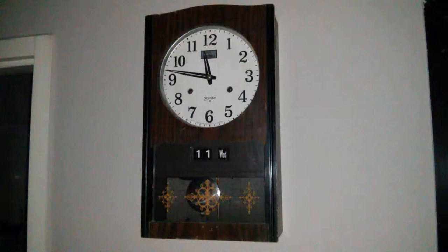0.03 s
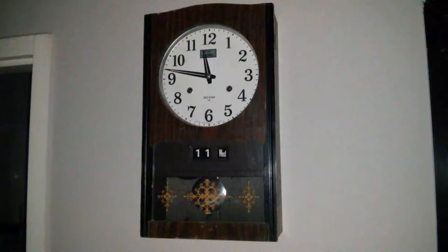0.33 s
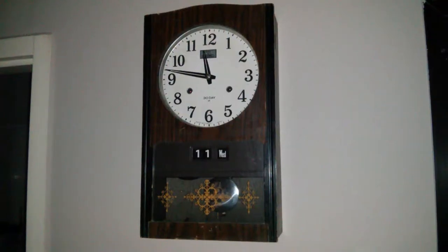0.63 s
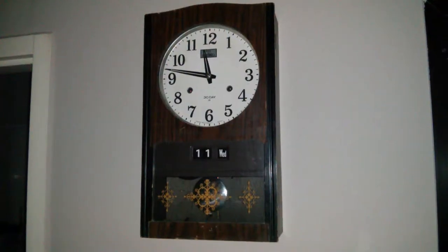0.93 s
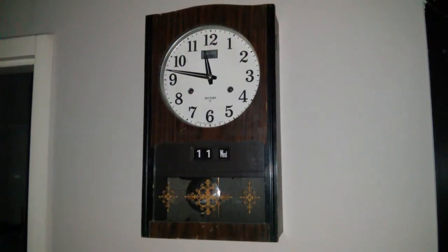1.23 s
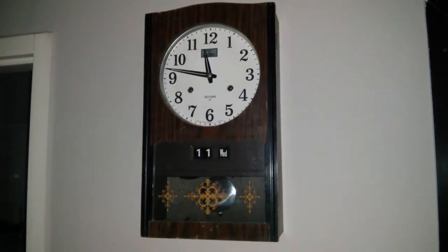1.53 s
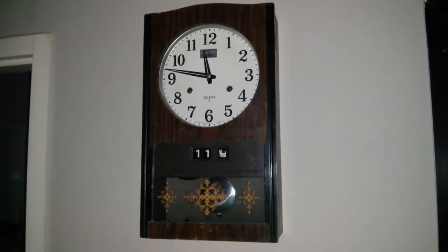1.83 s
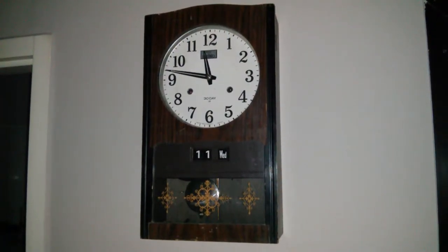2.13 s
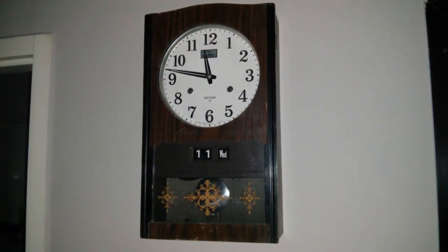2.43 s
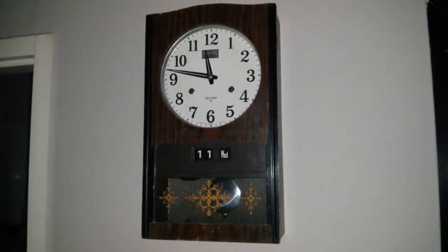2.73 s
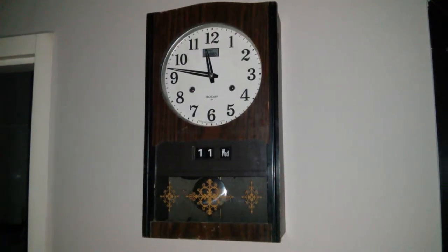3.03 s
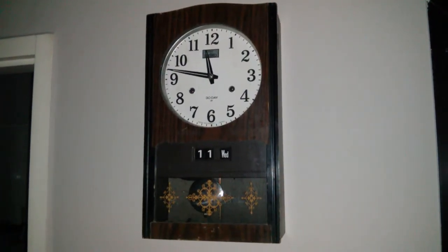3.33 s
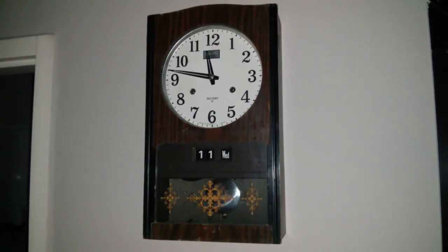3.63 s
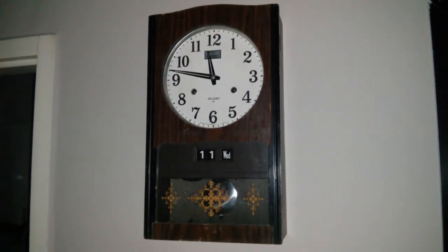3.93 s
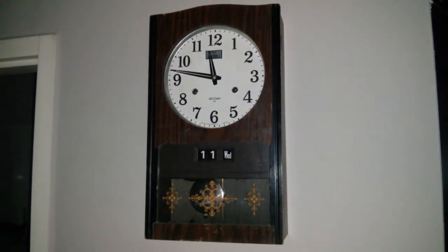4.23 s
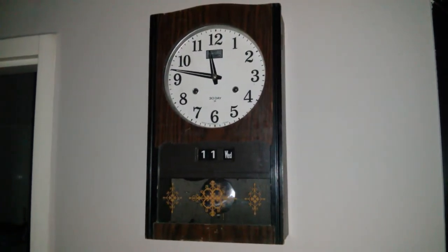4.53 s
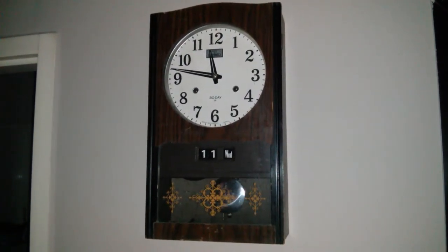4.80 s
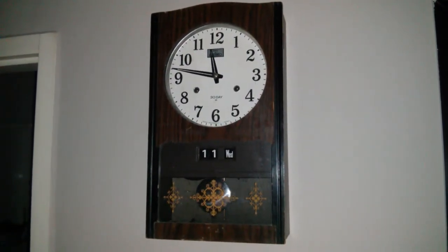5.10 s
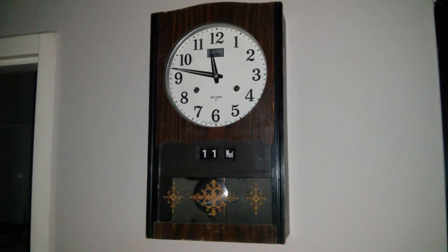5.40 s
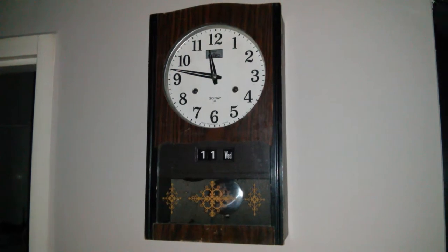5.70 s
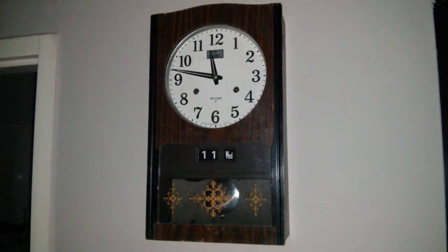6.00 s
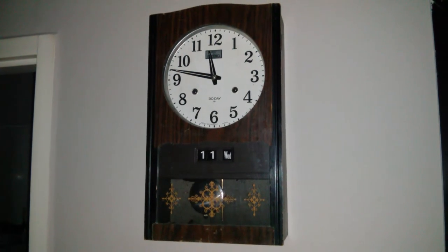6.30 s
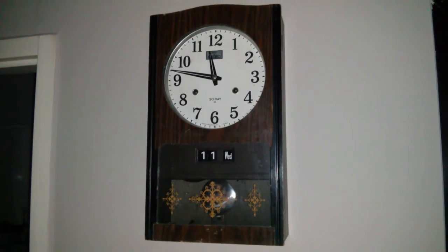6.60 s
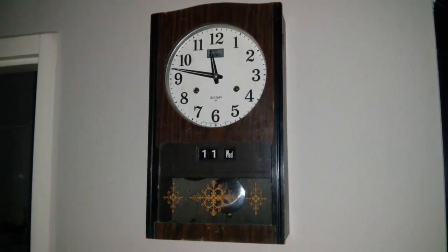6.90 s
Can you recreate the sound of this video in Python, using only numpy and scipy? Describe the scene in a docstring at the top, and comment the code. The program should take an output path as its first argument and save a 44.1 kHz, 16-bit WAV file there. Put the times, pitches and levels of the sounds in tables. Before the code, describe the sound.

A wooden pendulum wall clock ticks about twice a second in a quiet room, a bright tick alternating with a duller, softer tock. About a second in, one loud, sharp pop hits the microphone. A little later come a soft bump and a few tiny clicks close by. The clock keeps going over a faint low rumble, hum and hiss.

```python
"""A quiet room with a low rumble and hum, the microphone listening to a wooden pendulum wall clock.
It ticks slightly out of beat: the two pallets of the escapement ring the same movement and case, each
in its own way, and the room answers. One loud pop overloads the microphone; later come a soft bump and
a few tiny clicks close by. Faint hiss lies under it all, and a deep throb rises at the end."""
import sys
import numpy as np
from scipy import signal
from scipy.fft import rfft, irfft, next_fast_len
from scipy.io import wavfile
from scipy.ndimage import uniform_filter1d

SR = 44100
rng = np.random.default_rng(int(sys.argv[2]) if len(sys.argv) > 2 else 0)


def unload_audio(sound):
    """Save the sound as a 16-bit wav file, at the path given as the first command line argument."""
    columns = np.transpose(np.atleast_2d(sound))
    # keep every value between -1 and 1, then stretch to whole-number steps
    steps = np.round(np.clip(columns, -1, 1) * 32767)
    wavfile.write(sys.argv[1], SR, steps.astype(np.int16))


N = 315315

# Spectra of the room's rumble and deep throb: freq_hz, density_db
RUMBLE_SPECTRUM = [(12, -9.5), (20, -7), (32, -14.5), (48, -4.5), (75, -6.5), (100, -3), (160, -4),
                   (240, -9), (310, -12), (385, -26.5), (435, -19.5), (510, -33), (620, -23.5), (780, -37),
                   (3000, -61)]
THROB_SPECTRUM = [(10, -27), (24, -11), (32, 3), (42, -12), (70, -22), (130, -12), (190, -23.5),
                  (300, -62)]
# Slow wobble of the low end's level and of the hum's pitch: rate_hz, density_db
LEVEL_WOBBLE = [(1, -1.5), (7, 0.5), (16, -41), (60, -120)]
PITCH_WOBBLE = [(1, -0.5), (6, -2), (15, -38.5), (60, -120)]
# Long surges of rumble and hum, and lulls in the hum alone: middle_s, half_width_s, gain_db
LOW_SURGES = [(0.7, 0.6, 7.3), (3.85, 0.45, 3.5), (6.8, 0.42, 5.5)]
HUM_DIPS = [(3.05, 0.51, -13), (4.62, 0.25, -12.5)]
# Spectra of the faint whir, the microphone's hiss and the high fizz: freq_hz, density_db
WHIR_SPECTRUM = [(600, -30.5), (1150, -16.5), (1350, -6), (1550, -14.5), (1750, -8), (1900, 1),
                 (2050, -5), (2300, -18), (2750, -14), (3200, -22), (5800, -12), (8000, -32.5)]
HISS_SPECTRUM = [(300, -0.5), (1000, -2), (1400, -2.5), (1650, -4), (1900, 0.5), (2400, -7.5), (3300, -8.5),
                 (4500, -4.5), (5700, -1.5), (7400, -5.5), (10000, -4), (15600, -1.5), (16100, -40)]
FIZZ_SPECTRUM = [(3000, -36), (7500, -19.5), (9500, -10), (12000, -3), (14500, 2), (15700, -3),
                 (16100, -44.5)]
# Modes of the movement and wooden case: pitch_hz, tick_db, tock_db
CLOCK_MODES = [(1139, -28, -17), (1314, -3, -1), (1354, -9, -6), (1386, -2, 1), (1445, 2, -5),
               (1529, -13, -13), (1553, -12, -12), (1645, -15, -23), (1744, -10, -12), (1785, -10, -15),
               (1806, -11, -11), (1865, -10, -21), (1938, -9, -7), (1995, -12, -18), (2030, -8, -20),
               (2075, -7, -25), (2134, -15, -30), (2191, -4, -20), (2223, -11, -28), (2466, -21, -23),
               (2519, -18, -17), (2589, -12, -16), (2622, -9, -12), (2665, -13, -10), (2727, -14, -10),
               (2980, -28, -23)]
# The low modes take longer to get swinging: pitch_hz, rise_s
MODE_RISE = [(1350, .011), (2100, 0.00087)]
# How long case and room ring: freq_hz, t60_s
RING_TIMES = [(500, 0.52), (1350, 0.48), (2000, 0.39), (2700, .45), (5000, 0.81), (9000, 0.13)]
# Dense ring between the modes, and the extra brightness of first contact: freq_hz, gain_db
TICK_SPECTRUM = [(500, -48.5), (1080, -34), (1240, -19.5), (1420, -4), (1640, -12), (1850, -6.5),
                 (2220, -15), (2350, -31), (2650, -10), (2830, -20.5), (3200, -41.5), (4000, -46.5),
                 (4950, -34), (6500, -46)]
TOCK_SPECTRUM = [(500, -42.5), (1050, -24), (1240, -12), (1380, -1), (1660, -15.5), (1920, -9.5),
                 (2100, -17), (2350, -26.5), (2680, -7), (2830, -22.5), (3200, -32.5), (4000, -50),
                 (5100, -35), (8000, -47)]
CONTACT_TILT = [(1400, -8), (2100, 4), (3000, -1.5), (4500, -5)]
# Ping of the steel escapement: pitch_hz, level_db, t60_s
PING_MODES = [(4620, -9, 0.27), (4900, -3, 0.073), (5080, -2, 0.076), (5370, -14, 0.087)]
# That ping as the room returns it: freq_hz, gain_db
PING_ROOM_SPECTRUM = [(3300, -30), (4400, -6), (5100, -1), (5600, -9), (6500, -24)]
# The pop at the microphone and the sizzle after it: freq_hz, gain_db
POP_SPECTRUM = [(150, 1), (450, -1.5), (800, 2), (1300, -7), (1900, -2), (2300, -10.5), (3000, -9),
                (3450, -20), (3900, -4.5), (4350, 7), (4850, -7), (5500, 2.5), (8000, 2.5), (15000, 5.5)]
SIZZLE_SPECTRUM = [(1500, -11), (4000, -9), (9000, 2.5), (15600, -3), (16100, -38.5)]
# The clearest swells in the rumble: middle_s, pitch_hz, level_db
CLEAR_SWELLS = [(1.891, 167, -67.5), (3.632, 175, -66), (4.04, 228, -66.5), (4.17, 254, -69),
                (4.49, 184, -68.5), (5.031, 273, -69.5), (7.01, 234, -65)]
# Tiny clicks close to the microphone: start_s, level_db, edge_db
CLOSE_CLICKS = [(2.8998, -67, 16), (2.9071, -55, 13.5), (2.91, -56.5, -4), (2.939, -67.5, 20),
                (2.945, -64, 3)]
# Modes of the small hard thing that clicks: pitch_hz, level_db, t60_s
SMALL_OBJECT_MODES = [(3940, -5, 0.035), (4260, 0.5, 0.018), (5400, -1, 0.022), (10700, -10, .012)]
# A click's sharp edge and its return from the room: freq_hz, gain_db
EDGE_SPECTRUM = [(1000, -36), (3300, -26), (4200, -5), (7500, -21), (11000, 0), (13000, -27)]
CLICK_ROOM_SPECTRUM = [(3000, -32), (4000, 5), (4800, -6), (5600, 8), (7000, -12), (14000, -22)]

FIRST_TICK_S, SWING_S = 0.630, 1.0356  # one tick and one tock to each full swing
LOUD_PING_SWINGS = (0, 3)
POP_S = 1.0633
TIME_S = np.arange(N) / SR


def amp(db):
    return 10 ** (np.asarray(db) / 20)


def unit(x):
    """Scales to an energy of 1."""
    return x / np.sqrt(np.sum(x ** 2) + 1e-20)


def read(table, hz):
    """Reads a table on a log-frequency axis."""
    freqs, values = np.transpose(table)
    return np.interp(np.log(hz + 1), np.log(freqs + 1), values)


def seconds(length_s):
    return np.arange(int(length_s * SR)) / SR


def add(mix, start_s, sound):
    part = mix[max(round(start_s * SR), 0):][:len(sound)]
    part += sound[:len(part)]


def ramp(start_s, length_s):
    """Goes from 0 to 1 in a straight line, then holds."""
    return np.clip((TIME_S - start_s) / length_s, 0, 1)


def humps(rows):
    """A gain curve in dB, one smooth bell to a row."""
    return sum(db * np.exp(-((TIME_S - middle_s) / width_s) ** 2) for middle_s, width_s, db in rows)


def colour(x, spectrum):
    """Minimum-phase filter: nothing rings before a blow."""
    size = next_fast_len(len(x) + 4096)
    log_gain = np.log(amp(read(spectrum, abs(np.fft.fftfreq(size, 1 / SR)))))
    response = np.exp(np.conj(signal.hilbert(log_gain)))[:size // 2 + 1]
    return irfft(rfft(x, size) * response, size)[:len(x)]


def noise(spectrum, count=N):
    """Coloured noise of rms 1."""
    return unit(colour(rng.standard_normal(count), spectrum)) * np.sqrt(count)


def rumble_and_hum(rumble_db=-73, hum_db=-72.5, hum_hz=50.2):
    """The room's low end: rumble and a wavering hum that wobble and surge together."""
    wobble, surge_db = noise(LEVEL_WOBBLE), humps(LOW_SURGES)
    rumble = noise(RUMBLE_SPECTRUM) * amp(rumble_db + surge_db + 2 * wobble)
    pitch_hz = hum_hz * (1 + 0.017 * noise(PITCH_WOBBLE))
    hum = np.sqrt(2) * np.sin(2 * np.pi * np.cumsum(pitch_hz) / SR)
    return rumble + hum * amp(hum_db + 0.7 * surge_db + humps(HUM_DIPS) + 1.25 * wobble)


def whir(level_db=-80, drop_db=14.5):
    """A faint, narrow whir that sinks after the pop."""
    return noise(WHIR_SPECTRUM) * amp(level_db - drop_db * ramp(POP_S, length_s=0.35))


def hiss_and_fizz(hiss_db=-81, fizz_db=-73, drop_s=4.315, drop_db=20.5, return_db_per_s=5.5):
    """Steady microphone hiss, and a high fizz that falls away and creeps back."""
    dip_db = return_db_per_s * np.maximum(TIME_S - drop_s, 0) - drop_db * ramp(drop_s, length_s=0.2)
    return amp(hiss_db) * noise(HISS_SPECTRUM) + amp(fizz_db + dip_db) * noise(FIZZ_SPECTRUM)


def ring(t, hz, t60_s):
    """One dying mode at a random phase."""
    return amp(-60 * t / t60_s) * np.sin(2 * np.pi * (hz * t + rng.random()))


def diffuse(t, spectrum, rise_s):
    """Dense reflections that build up, then die band by band."""
    hz, frame_s, bands = signal.stft(rng.standard_normal(len(t)), SR, nperseg=256)
    bands = bands * amp(-60 * frame_s / read(RING_TIMES, hz)[:, None])
    tail_bins = rfft(signal.istft(bands, SR, nperseg=256)[1][:len(t)])
    local_power = abs(uniform_filter1d(abs(tail_bins) ** 2, 45))
    even_tail = irfft(tail_bins / np.sqrt(local_power + 1e-12), len(t))
    envelope = (1 - np.exp(-t / rise_s)) * (1 - (t / t[-1]) ** 2) ** 2
    return unit(colour(even_tail * envelope, spectrum))


def snap(t, spectrum, decay_s):
    """A brief burst of contact noise."""
    return unit(colour(rng.standard_normal(len(t)) * np.exp(-t / decay_s), spectrum))


def beats(lag_s, creep_s):
    """Yields each beat's start_s on one pallet, and the swings since the steel pinged loudest."""
    for swing in range(-1, int(N / SR / SWING_S) + 1):
        start_s = FIRST_TICK_S + swing * (SWING_S + creep_s) + lag_s
        if start_s > 0:
            yield start_s, min((swing - loud for loud in LOUD_PING_SWINGS if loud <= swing), default=2)


def pallet(side, drops, spectrum, modes_db, room_db, rise_s, snap_db, knock_db, knock_decay_s,
           echo_s, echo_db, ping_db):
    """Escape-wheel teeth drop on one pallet: a snap, the case's knock and ring, a ping, the room."""
    t, out = seconds(0.7), np.zeros(N)
    modes = np.zeros(len(t))
    for hz, *levels_db in CLOCK_MODES:
        bloom = 1 - np.exp(-t / read(MODE_RISE, hz))
        modes += amp(levels_db[side]) * bloom * ring(t, hz, read(RING_TIMES, hz))
    knock = unit(diffuse(t, spectrum, rise_s) * np.exp(-t / knock_decay_s))  # damped panels die first
    room = amp(room_db) * diffuse(t, spectrum, rise_s)
    contact = amp(snap_db) * unit(colour(snap(t, spectrum, decay_s=0.0031), CONTACT_TILT))
    beat = contact + amp(modes_db) * unit(modes) + amp(knock_db) * knock + room
    add(beat, echo_s, amp(echo_db) * contact)  # a strong early reflection
    ping_room = amp(22) * unit(diffuse(t, PING_ROOM_SPECTRUM, rise_s) * np.exp(-t / 0.069))
    for start_s, swings_since_loud in drops:
        sway_db = 0.6 * np.cos(2 * np.pi * start_s / 5.7)  # the beats slowly weaken and recover
        beat_db = -1.5 + sway_db + 0.36 * rng.standard_normal()
        tooth = amp(room_db - 7) * diffuse(t, spectrum, rise_s)  # no two teeth land alike
        ping = sum(amp(db) * ring(t, hz, t60_s) for hz, db, t60_s in PING_MODES)
        add(out, start_s, amp(beat_db) * (beat + tooth))
        add(out, start_s, amp(ping_db - 5.5 * swings_since_loud) * (ping + ping_room))
    return out


def wall_clock():
    """A bright, sharp tick and a duller, softer tock that comes early, a little more so each swing."""
    tick = pallet(0, beats(lag_s=0, creep_s=0), TICK_SPECTRUM, modes_db=-24,
                  room_db=-30.5, rise_s=0.0045, snap_db=-30.5, knock_db=-26.5, knock_decay_s=0.08,
                  echo_s=0.021, echo_db=-1.5, ping_db=-68.5)
    tock = pallet(1, beats(lag_s=0.494, creep_s=-0.0008), TOCK_SPECTRUM, modes_db=-26,
                  room_db=-29.5, rise_s=0.0068, snap_db=-33.5, knock_db=-28.5, knock_decay_s=0.047,
                  echo_s=0.0085, echo_db=0.5, ping_db=-75.5)
    return tick + tock


def microphone_pop(relax_s=0.0018, rebound_delay_s=0.0092, rebound_rise_s=0.0019, ceiling=0.56):
    """A sudden push overloads the microphone, swings back, rebounds and leaves a ping and sizzle."""
    t, out = seconds(0.6), np.zeros(N)
    push = amp(5.5) * (1 - t / relax_s) * np.exp(-t / relax_s)
    rebound = -amp(-6.5) * t / rebound_rise_s * np.exp(-t / rebound_rise_s)
    add(push, rebound_delay_s, rebound)
    slow_recovery = signal.butter(1, 6, "high", fs=SR)  # of the input stage
    overload = signal.lfilter(*slow_recovery, np.minimum(push, ceiling))
    ping = amp(-38) * ring(t, hz=4020, t60_s=0.03)
    sizzle = noise(SIZZLE_SPECTRUM, len(t)) * amp(-62 - 60 * t / 0.85)
    add(out, POP_S, colour(overload, POP_SPECTRUM) + ping + sizzle)
    return out


def rumble_swells(length_s=0.11, strays_per_s=0.91, stray_db=-74.5):
    """Brief narrow swells in the rumble: a few clear ones and fainter strays at random."""
    t, out = seconds(length_s), np.zeros(N)
    strays = [(rng.uniform(0, N / SR), rng.uniform(151, 255), stray_db)
              for _ in range(round(strays_per_s * N / SR))]
    for middle_s, hz, db in CLEAR_SWELLS + strays:
        band = [(hz * 0.76, -28), (hz * 0.87, 0), (hz * 1.036, 0), (hz * 1.5, -35), (hz * 4, -80)]
        swell = unit(noise(band, len(t)) * np.hanning(len(t))) * np.sqrt(len(t) / 2)
        add(out, middle_s - length_s / 2, amp(db) * swell)
    return out


def soft_bump(start_s=2.843, pitch_hz=210, gain_db=-47.5):
    """One low mode with a soft onset, a quick fall and a faint tail."""
    t, out = seconds(0.3), np.zeros(N)
    onset = (1 - np.exp(-t / 0.0014)) ** 2
    fade = amp(-60 * t / 0.06) + amp(-17 - 60 * t / 0.25)
    add(out, start_s, amp(gain_db) * onset * fade * np.sin(2 * np.pi * pitch_hz * t))
    return out


def close_clicks():
    """Something small and hard clicks near the microphone: a short ring, a sharp edge, the room."""
    t, out = seconds(0.3), np.zeros(N)
    for start_s, level_db, edge_db in CLOSE_CLICKS:
        body = sum(amp(db) * ring(t, hz, t60_s) for hz, db, t60_s in SMALL_OBJECT_MODES)
        edge = amp(edge_db) * snap(t, EDGE_SPECTRUM, decay_s=0.0007)
        room = amp(7.5) * diffuse(t, CLICK_ROOM_SPECTRUM, rise_s=0.003)
        add(out, start_s, amp(level_db) * (0.67 * body + edge + room))
    return out


def deep_throb(full_s=6.91, full_db=-57, rise_db_per_s=71):
    """Very low noise that grows near the end, then holds."""
    return noise(THROB_SPECTRUM) * amp(full_db - rise_db_per_s * np.maximum(full_s - TIME_S, 0))


def scene():
    """The clock and the room around it, at one microphone."""
    foreground = wall_clock() + microphone_pop() + soft_bump() + close_clicks()
    room_tone = rumble_and_hum() + deep_throb() + whir() + hiss_and_fizz() + rumble_swells()
    return (foreground + room_tone)[None]


def record(dry, cutoff_hz=16800):
    """The microphone opens with a short fade, quick at first; the top of the treble is cut off."""
    fade_in = ramp(start_s=0.11, length_s=0.27) ** 0.82
    low_pass = signal.firwin(511, cutoff_hz, window=("kaiser", 9), fs=SR)
    return signal.oaconvolve(dry * fade_in, low_pass[None], "same")


dry = scene()
out = record(dry)
unload_audio(out)
```